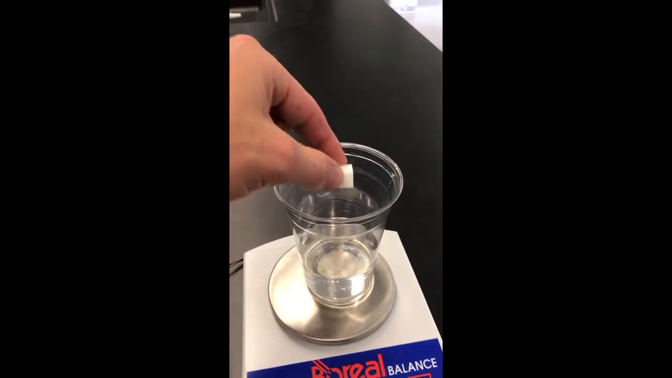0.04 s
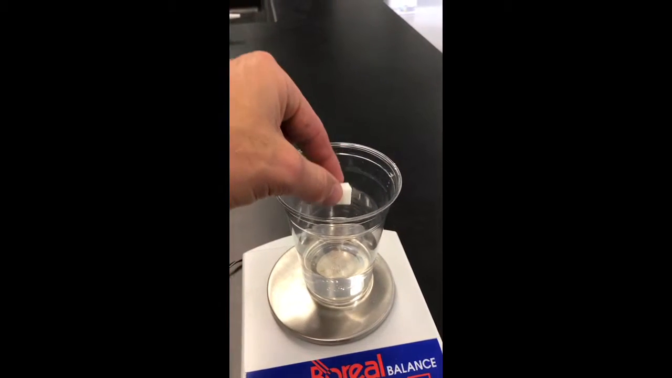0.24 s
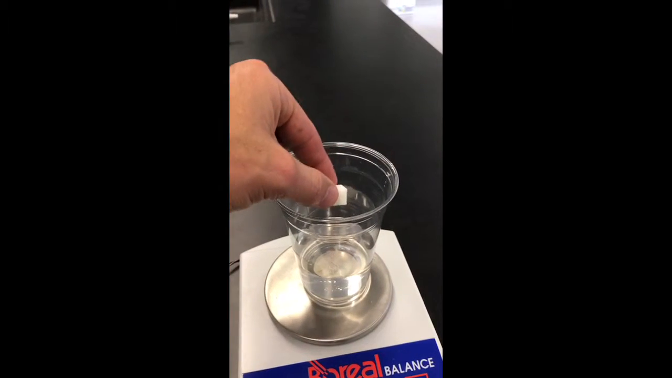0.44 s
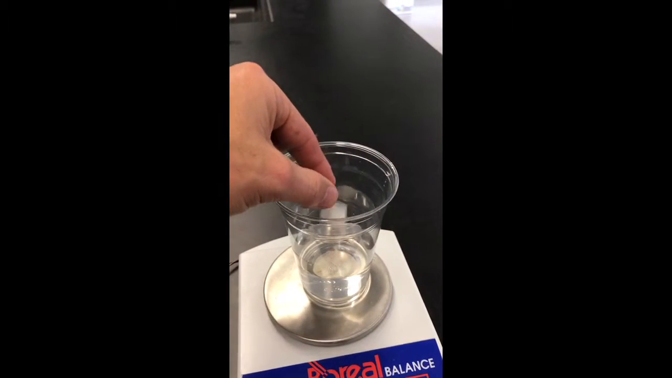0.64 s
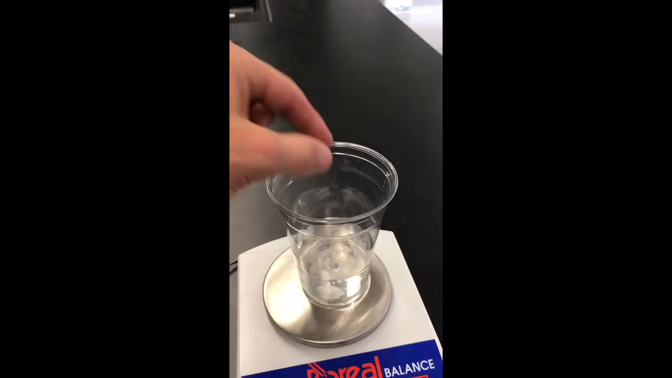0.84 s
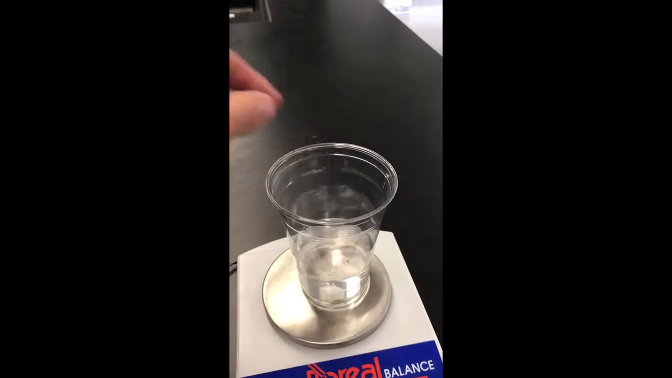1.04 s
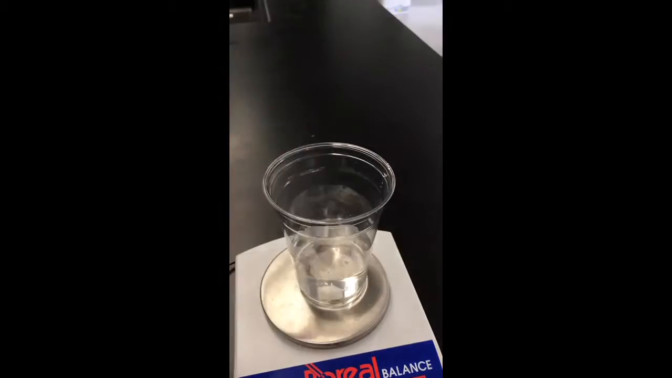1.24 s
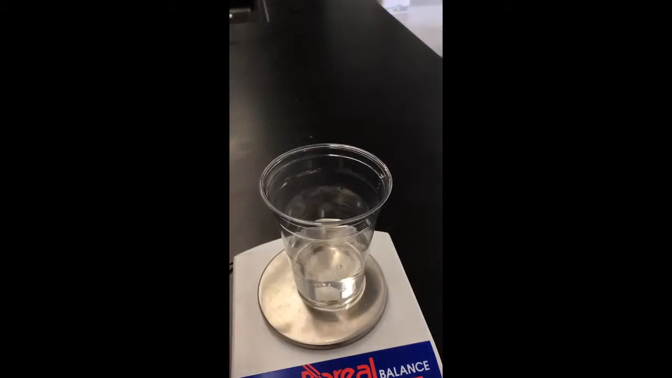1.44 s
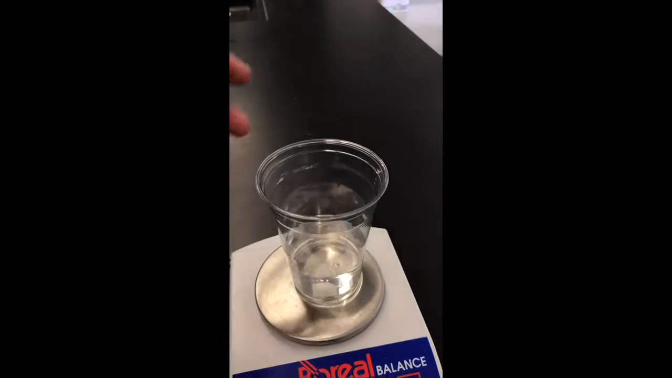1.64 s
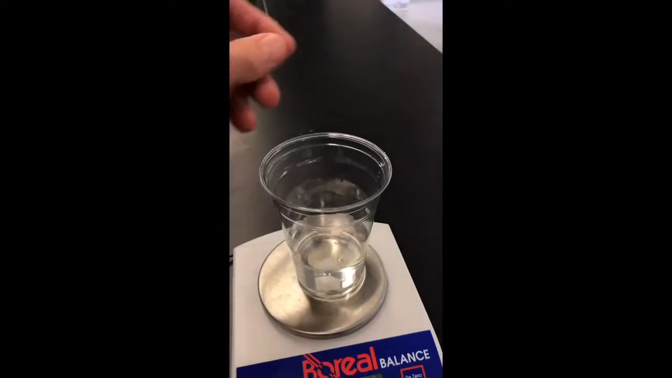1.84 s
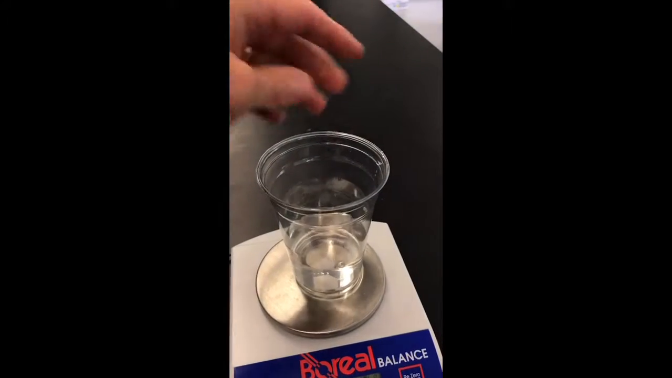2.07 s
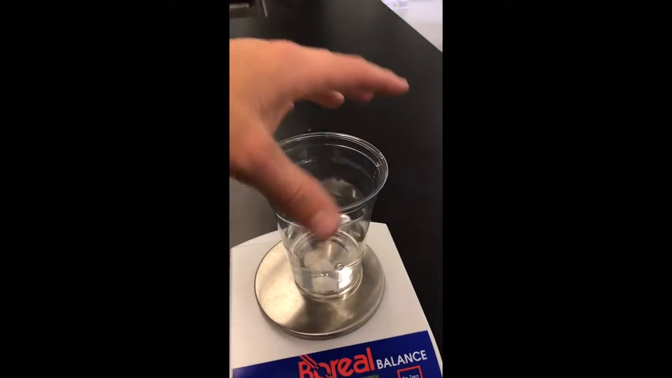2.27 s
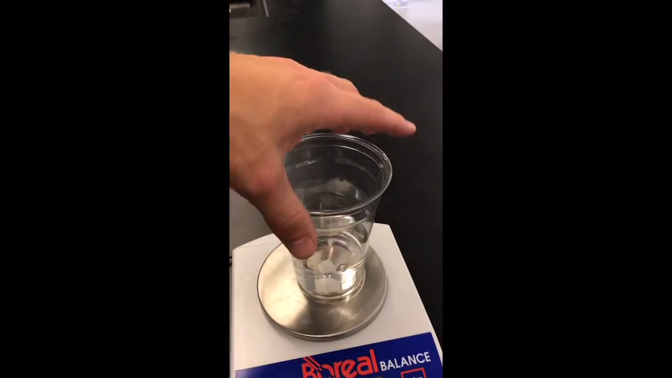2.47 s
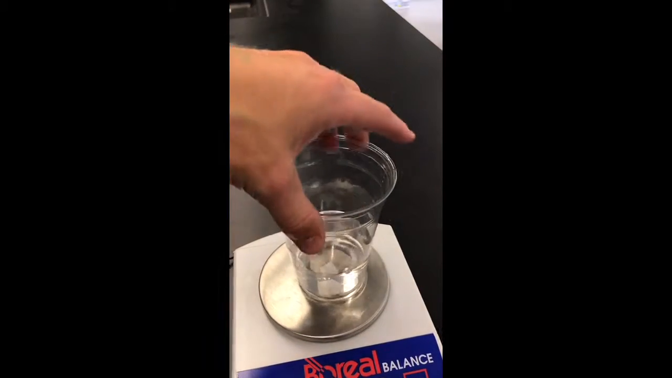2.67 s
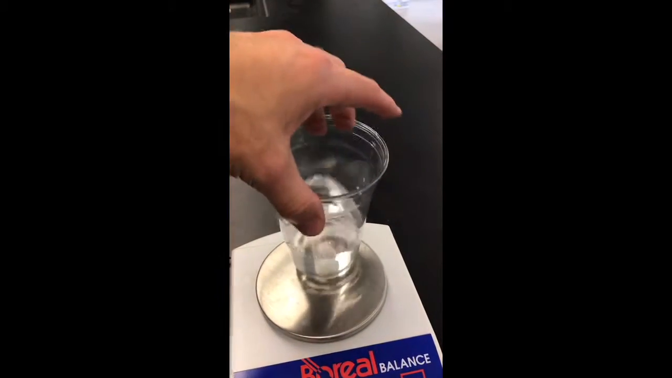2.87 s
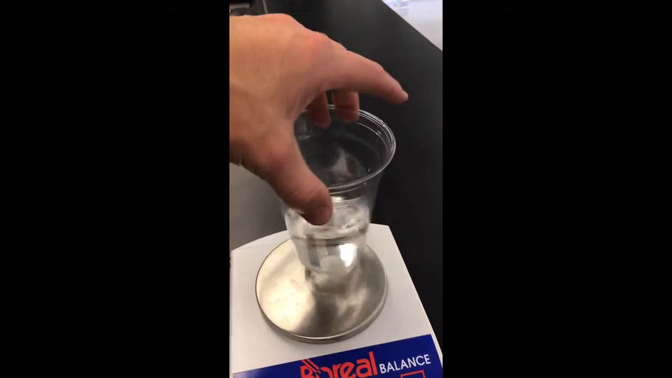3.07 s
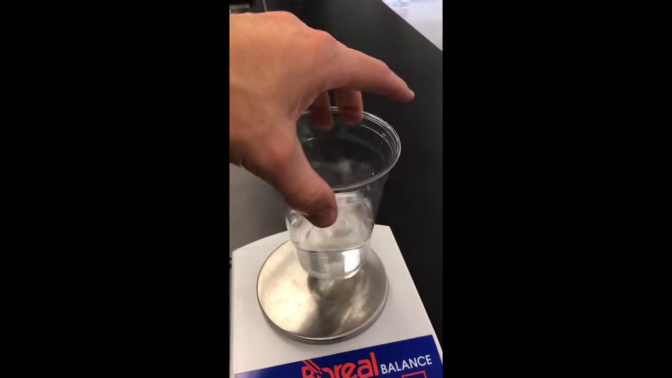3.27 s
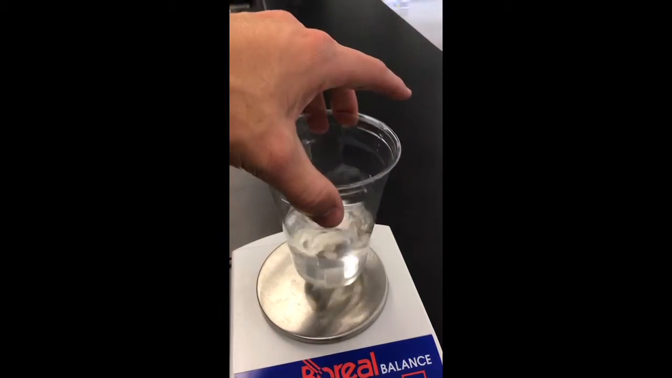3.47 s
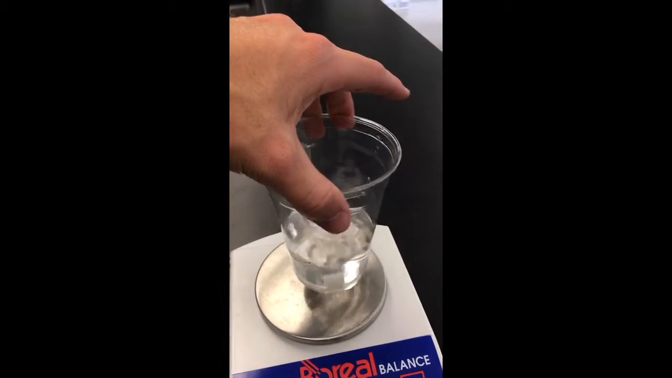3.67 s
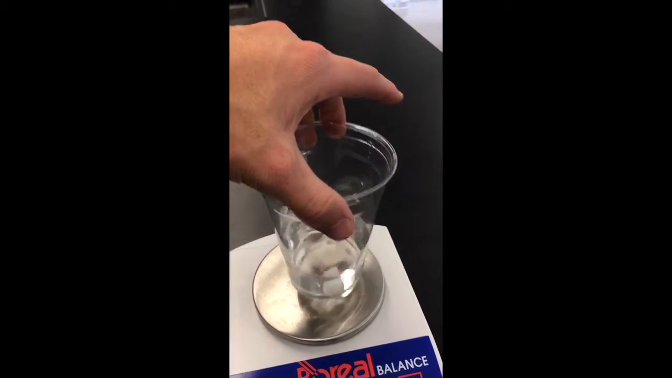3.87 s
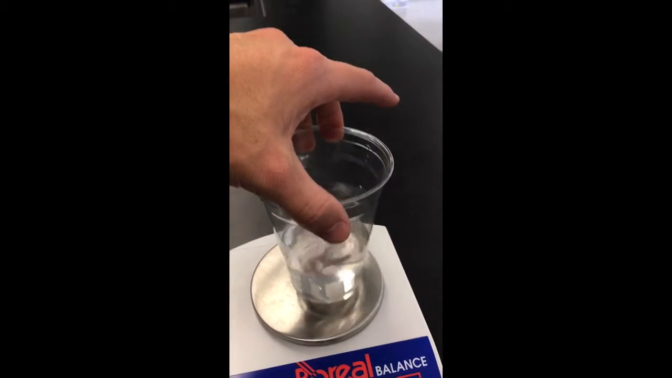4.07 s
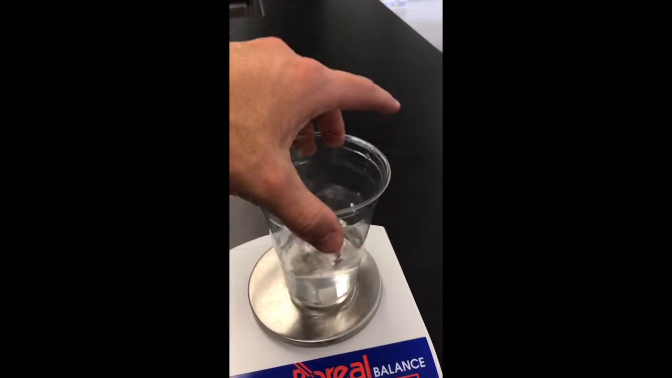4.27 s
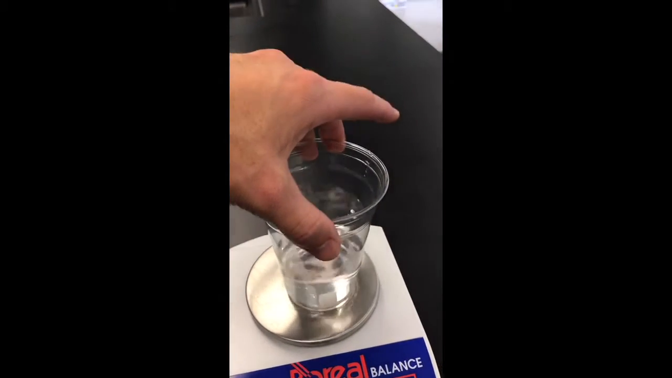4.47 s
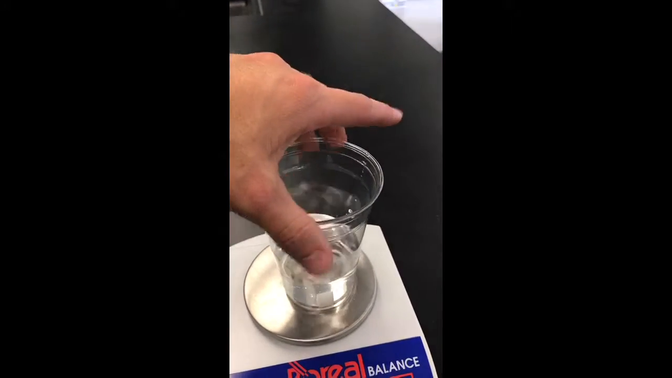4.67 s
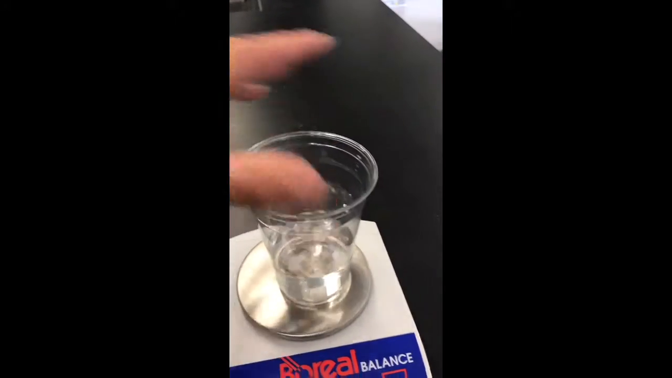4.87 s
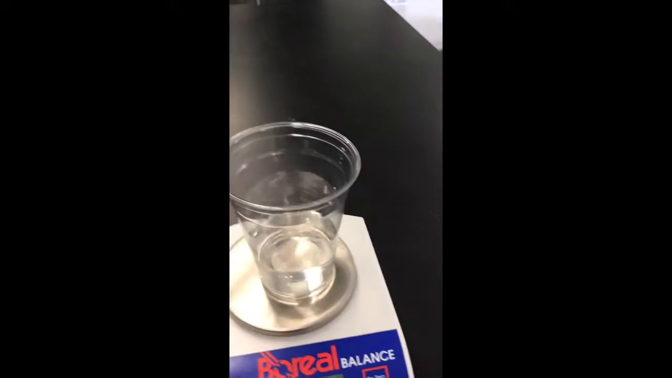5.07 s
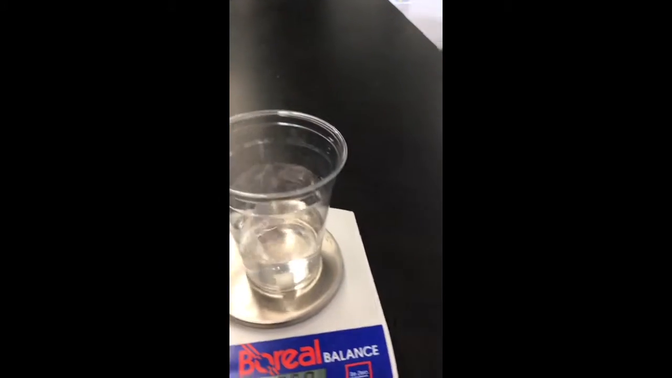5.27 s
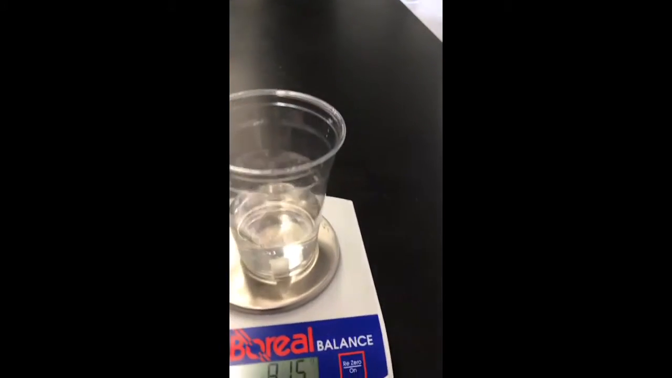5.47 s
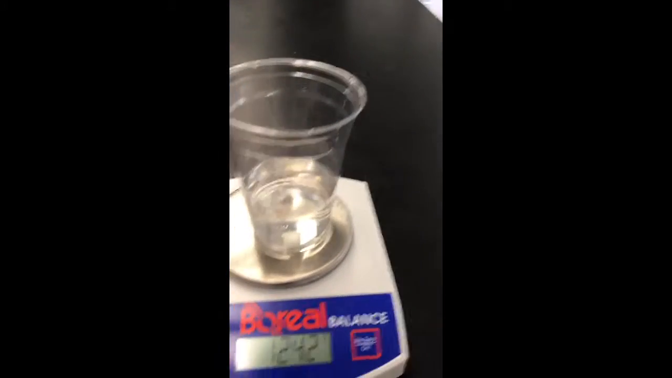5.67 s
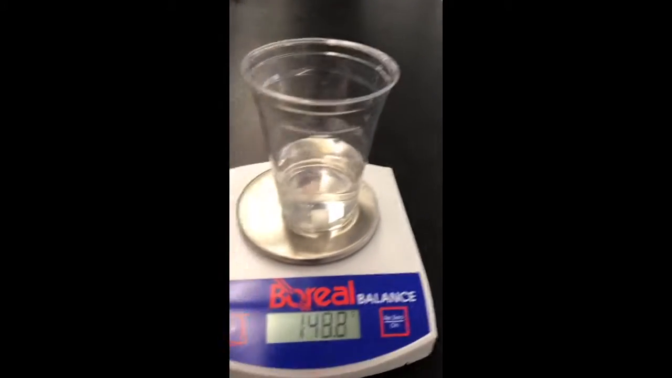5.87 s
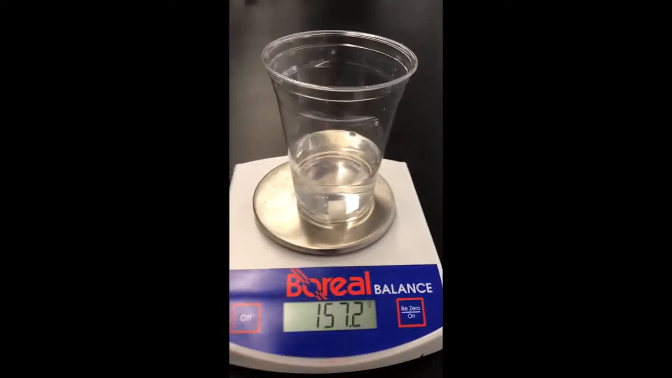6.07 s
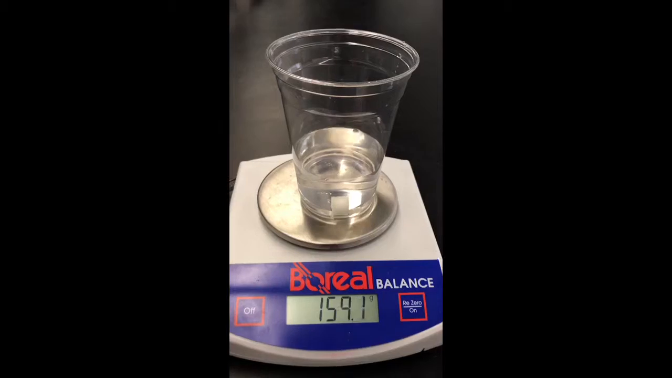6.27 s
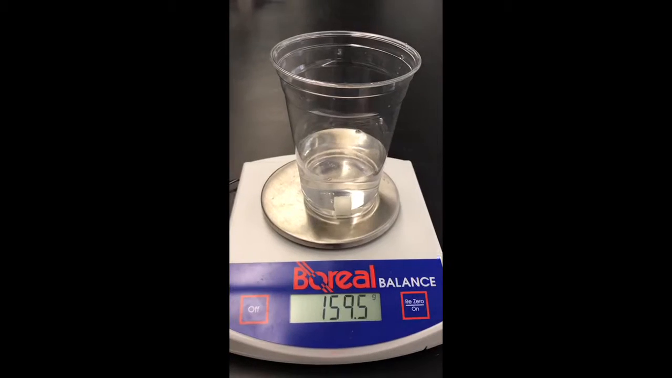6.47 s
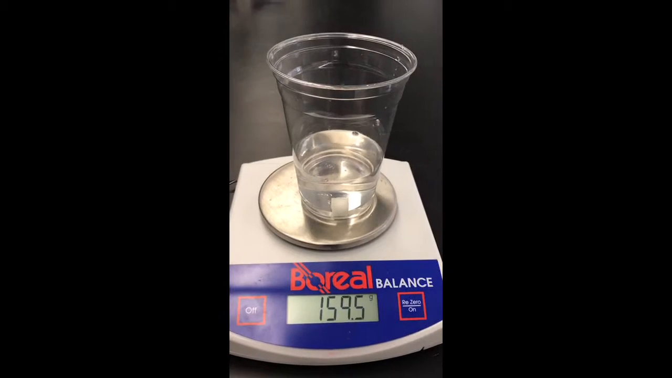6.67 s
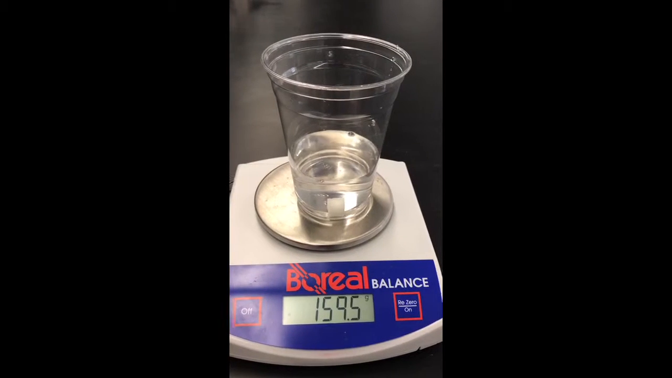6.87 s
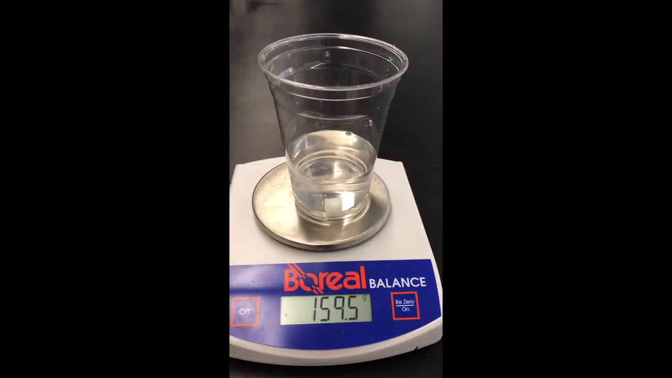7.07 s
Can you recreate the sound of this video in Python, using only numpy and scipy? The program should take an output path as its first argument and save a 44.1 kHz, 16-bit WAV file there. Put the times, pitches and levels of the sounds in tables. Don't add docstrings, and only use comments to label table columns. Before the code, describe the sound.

A sugar cube clacks into a thin plastic cup of water, then light swirling taps and set-down clicks in a quiet, softly humming room.

```python
import sys
import numpy as np
from scipy import signal
from scipy.fft import rfft, irfft, next_fast_len
from scipy.io import wavfile
from scipy.ndimage import map_coordinates

SR = 44100
rng = np.random.default_rng(int(sys.argv[2]) if len(sys.argv) > 2 else 0)


def ratio(d):
    e = np.asarray(d, float) / 20
    return 10 ** e


def materialize(psi):
    bounded = np.clip(np.atleast_2d(psi).T, -1, 1)
    quanta = np.round(bounded * 32767).astype(np.int16)
    wavfile.write(sys.argv[1], SR, quanta)


N = 314105
T = np.arange(N) / SR

# (frequency [Hz], level [dB per Hz])
DUCT_SPECTRUM = [(15, -25), (26, -16), (34, -12), (45, -8.5), (62, -3.5), (100, -3.5), (140, -9.5),
                 (200, -4.5), (250, -16), (320, -17), (500, -19), (1150, -22), (1650, -27.5), (3000, -35.5),
                 (6000, -49.5)]
# (multiple of shaft speed [1], level [dB])
FAN_ORDERS = [(1, -60.5), (4, -59), (5, -61), (6, -76), (7, -77.5)]
# (frequency [Hz], level [dB per Hz])
HISS_SPECTRUM = [(300, -15), (2000, 1), (4000, 1.5), (7000, -0.5), (12000, -3.5), (15900, -5)]
# (frequency [Hz], width [Hz], depth [0-1])
PORT_NOTCHES = [(5000, 240, 0.33), (7660, 650, 0.24), (10400, 590, 0.34)]
# (frequency [Hz], 60 dB decay time [s])
ROOM_DECAY = [(300, 0.35), (1000, 0.48), (3000, 0.39), (6000, 0.36), (12000, 0.17)]
# (time [s], length [s], level
# [dB], centre [Hz])
BRUSHES = [(6.035, .037, -61, 3000), (2.065, .015, -70, 8000), (1.71, .0015, -63, 11500),
           (2.157, .001, -67, 13500), (1.27, .004, -67, 7000), (1.327, .004, -67, 6100),
           (.775, .003, -65, 8000), (1.067, .002, -68, 9500), (3.5915, .0015, -59, 8600)]
# (time [s], level [dB], pitch [Hz], life [cycles])
RATTLES = [(.8300, -9, 5000, 5), (0.8323, -15, 5200, 8.4), (0.836, -16, 8700, 6.3), (0.8395, -18, 2980, 12),
           (.8405, -35, 5500, 6.8), (0.843, -33, 2050, 4.3), (.8470, -20, 2350, 5.1),
           (0.849, -27, 1200, 6.2), (.8545, -37, 2100, 5.4), (.8590, -32, 610, 6.9),
           (0.861, -38, 1100, 6.9), (1.0097, -37, 1860, 11), (1.0100, -39.5, 2700, 16),
           (1.0103, -38, 1030, 8), (1.011, -44, 3800, 7), (1.016, -41, 1900, 6.8)]
# (frequency [Hz], width [Hz], level [dB])
CUP_MODES = [(295, 24, -11), (592, 28, -5), (855, 40, 4.5), (1032, 39, 1), (1154, 34, -4.5),
             (1364, 28, -3.5), (1540, 26, -5), (1735, 46, -1), (1880, 25, 1.5), (2080, 30, -3),
             (2350, 59, -9), (2760, 64, -2), (3200, 90, -23), (3550, 120, -9), (4090, 87, -3),
             (4940, 140, -21), (5500, 200, -16), (6400, 2600, -12.5), (8600, 2100, -34)]
# (frequency [Hz], level [dB per Hz])
SPLASH_SPECTRUM = [(250, -34), (550, 14), (1000, -10), (2500, -4), (5000, -5.5), (8000, -12), (14000, -27)]
# (start [s], length [s], level at the end [dB])
SLIDES = [(2.602, 0.019, -49.5), (2.677, 0.011, -56.5), (2.7, 0.012, -51.5), (4.503, 0.037, -49.5),
          (4.551, .021, -48), (4.698, 0.023, -57)]
# (frequency [Hz], width [Hz], level [dB])
PAN_MODES = [(1650, 300, -5), (2394, 130, 0.5), (2700, 140, 4.5), (2940, 98, 4.5), (3220, 680, -10.5),
             (4750, 600, -10), (5630, 200, -5), (7260, 1500, -14.5), (10900, 3600, -20.5)]
# (frequency [Hz], width [Hz], level [dB])
WALL_MODES = [(1640, 210, -8.5), (2050, 250, -16), (2660, 160, -8), (3170, 360, -22)]
# (frequency [Hz], width [Hz], level [dB])
AIR_MODES = [(856, 60, 5.5), (673, 56, -5), (1000, 63, -10)]
# (frequency [Hz], width [Hz], level [dB])
EDGE_MODES = [(3550, 560, -10.5), (5500, 1600, -10.5), (7200, 820, -7), (8700, 1800, -25),
              (12000, 6000, -39)]
# (time [s], wall level [dB], air column over wall [dB], snap over wall [dB])
NEAR_BASE = [(3.2385, -54, 9, -15), (3.4464, -64, 5, 1), (3.547, -55, 5, -10), (3.5638, -54.5, 12, -13),
             (3.7964, -53.5, 0, 10.5), (3.808, -60, 8, -8), (3.9908, -48, 7.5, -19),
             (4.0536, -39.5, 6.5, -5), (4.066, -53, 9, -10), (4.4634, -44, 2.5, -9), (4.5974, -54, -3, 6)]
# (time [s], wall level [dB], air column over wall [dB], snap over wall [dB])
MID_WALL = [(3.5342, -38, -7, -20), (3.579, -57, 7, -12), (3.9204, -62, 9, -4), (3.9543, -43.5, -5, -7),
            (4.3494, -65, 12, -8), (4.7959, -48.5, -2, -6)]
# (time [s], wall level [dB], air column over wall [dB], snap over wall [dB])
NEAR_RIM = [(2.8868, -57.5, 12, 11), (3.0838, -50.5, -0.5, -4), (3.5254, -32.5, -3.5, -3),
            (3.5338, -36.5, -4, -7), (3.7249, -45.5, -1.5, -5.5), (3.7787, -40.5, -5.5, -6),
            (3.9734, -50, -11, -9), (3.9925, -44, -9, -16), (3.999, -58, 11, -8), (4.2068, -36, -4, -9),
            (4.2264, -54, 4, -11), (4.2621, -53, 8.5, -17), (4.3264, -69, 7, -7), (4.4552, -39, -3.5, 1.5),
            (4.569, -45.5, -1.5, -13)]
# (time [s], wall level [dB], air column over wall [dB], snap over wall [dB])
SET_DOWN = [
    (4.6692, -49.5, -12, 1),
    (4.7256, -37.5, -18, 1.7),
    (4.7424, -44, -20, 2),
    (4.7635, -33, -14, 3.7),
]


def unit(x):
    return x / np.sqrt(np.mean(x ** 2) + 1e-20)


def peak(x):
    return x / np.max(np.abs(x))


def along(points, hz):
    f, v = np.transpose(points)
    return np.interp(np.log(hz + 1), np.log(f + 1), v)


def wobble(rate):
    return map_coordinates(rng.standard_normal(int(N * rate / SR) + 4), [T * rate])


def filtered(x, response):
    m = next_fast_len(len(x) + SR // 2)
    return irfft(rfft(x, m) * response(np.fft.rfftfreq(m, 1 / SR)), m)[:len(x)]


def modes(table):
    def response(f):
        total = 0
        for k, (centre, width, db) in enumerate(table):
            damping = 1j * f * width
            total = total + (-1) ** k * ratio(db) * damping / (centre * centre - f * f + damping)
        return total
    return response


def noise(spectrum):
    return unit(filtered(rng.standard_normal(N), lambda hz: ratio(along(spectrum, hz))))


def add(out, s, piece):
    out[round(s * SR):][:len(piece)] += piece


def room(x):
    hz, t, z = signal.stft(rng.standard_normal(SR // 2), SR, nperseg=256)
    decay = ratio(-60 * t / along(ROOM_DECAY, hz)[:, None])
    tail = signal.istft(z * decay, SR, nperseg=256)[1]
    delayed = np.pad(x, (300, 0))
    return signal.fftconvolve(delayed, tail / np.linalg.norm(tail))[:N]


def ventilation():
    air = noise(DUCT_SPECTRUM)
    low = filtered(air, lambda hz: 1 / (1 + (hz / 300) ** 4))
    rumble = ratio(0.26 * wobble(1.38) + 1.44 * wobble(4.77)) * low
    rush = ratio(0.25 * wobble(0.8) + 0.6 * wobble(2.4)) * (air - low)
    return ratio(-55) * (rumble + rush)


def fan():
    motor_hz = 58.16
    turn = 2 * np.pi * motor_hz * T
    out = np.zeros(N)
    for k, db in FAN_ORDERS:
        level = ratio(db + 1.57 * wobble(3.06))
        out += level * np.sin(k * turn + 0.18 * wobble(4.1) + 7 * rng.random())
    return np.sqrt(2) * out


def mains():
    level = ratio(-58.5 + 2.3 * wobble(12))
    return np.sqrt(2) * level * np.sin(2 * np.pi * 120 * T + 0.53 * wobble(8))


def lamp():
    whistle_hz, level_db, fading_db = 15226, -86, 3
    shadow_s, shadow_half_s, shadow_db = 6.53, 0.2, -14
    shadow = shadow_db * np.exp(-((T - shadow_s) / shadow_half_s) ** 4)
    level = ratio(level_db + fading_db * wobble(7) + shadow)
    return np.sqrt(2) * level * np.sin(2 * np.pi * whistle_hz * T + 0.8 * wobble(7))


def microphone_hiss():
    duck_s, hold_s, ramp_s, duck_db = 6.682, 0.062, 0.01, -10.5
    outside_s = np.maximum(duck_s - T, T - duck_s - hold_s)
    duck = ratio(duck_db * np.clip(1 - outside_s / ramp_s, 0, 1))
    return ratio(-66) * duck * noise(HISS_SPECTRUM)


def rustle():
    out = np.zeros(N)
    for s, length, db, hz in BRUSHES:
        t = np.arange(-3 * length, 3 * length, 1 / SR)
        width_hz = hz * np.clip(90 * length, 0.25, 1.8)
        band = modes([(hz, width_hz, 0)])
        puff = unit(filtered(rng.standard_normal(10000), lambda f: band(f) ** 2))[:len(t)]
        add(out, s - 3 * length, ratio(db) * puff * np.exp(-(t / length) ** 2))
    return out


def blow():
    push, t, push_s = np.zeros(N), np.arange(1500) / SR, 0.00016
    add(push, 0.8294, ratio(7.5) * np.sin(np.pi * np.clip(t / push_s, 0, 1)))
    closing = ratio(-1100 * np.clip(T - 0.841, 0, 1))
    return closing * filtered(push, modes(CUP_MODES))


def rattle():
    out, t = np.zeros(N), np.arange(1500) / SR
    for s, db, hz, cycles in RATTLES:
        turns = hz * t
        envelope = ratio(db - 25 * turns / cycles) * (1 - np.exp(-turns))
        add(out, s, envelope * np.sin(2 * np.pi * turns))
    return out


def crunch():
    start_s, start_db, sag_db_per_s = 0.8298, -29.5, 650
    soaked_s, soak_db_per_s = 0.843, 2500
    level_db = start_db - sag_db_per_s * np.clip(T - start_s, 0, 1)
    level_db = level_db - soak_db_per_s * np.clip(T - soaked_s, 0, 1)
    level_db = level_db - 70000 * np.clip(start_s - T, 0, 0.01)
    grit = noise([(1200, -42), (2500, -2.5), (5000, -5), (10000, -15), (15500, -26)])
    return ratio(level_db + 3.5 * wobble(700)) * grit


def settling():
    spray = np.zeros(N)
    spray[[round(0.836 * SR), round(0.848 * SR)]] = ratio(-14)
    return filtered(room(spray), lambda hz: ratio(along(SPLASH_SPECTRUM, hz)))


def drop():
    cup = blow() + rattle()
    return cup + ratio(-19.5) * room(cup) + crunch() + settling()


def scrape():
    grip_s, let_go_s, press_db = 0.008, 0.015, 5.5
    grains = rng.standard_normal(N) * ratio(2 * wobble(900) + wobble(120))
    stroke = np.zeros(N)
    for s, length, db in SLIDES:
        press = press_db * np.clip(1 - (T - s) / length, 0, 1)
        rise = 20 * np.clip(s - T, 0, 1) / grip_s
        fall = 20 * np.clip(T - s - length, 0, 1) / let_go_s
        stroke += ratio(db - press - rise - fall)
    return stroke * unit(filtered(grains, modes(PAN_MODES)))


def tap(air_db, snap_db, wall_hz, snap_hz):
    t = np.arange(3000) / SR
    grit = rng.standard_normal((5, len(t)))
    wall_hz = wall_hz * np.exp(0.025 * grit[1, 0])
    snap_hz = snap_hz * np.exp(0.08 * grit[3, 0])
    contact = t * ratio(-60 * t / 0.0068)

    tilt = np.exp(0.025 * np.clip(grit[0, 0], -1.5, 1.5))
    column = [(c * tilt, w, g) for c, w, g in AIR_MODES]
    puff = (1 + 0.69 * grit[0]) * t ** 2 * ratio(-60 * t / 0.0043)
    air = filtered(puff, modes(column))

    damped_hz = 152 + 40 * max(-8 - air_db, 0)
    wall = filtered(grit[1] * contact, modes([(wall_hz, damped_hz, 0)]))
    wall = wall + filtered(grit[2] * contact, modes(WALL_MODES))

    bite = t * ratio(-60 * t / 0.0057)
    snap = filtered(grit[3] * contact, modes([(snap_hz, 450, 0)]))
    snap = snap + filtered(1.46 * grit[4] * bite, modes(EDGE_MODES))
    return ratio(air_db) * peak(air) + peak(wall) + ratio(snap_db) * peak(snap)


def taps_at(contacts, wall_hz, snap_hz):
    out = np.zeros(N)
    for s, db, air_db, snap_db in contacts:
        add(out, s + 0.0004, ratio(db) * tap(air_db, snap_db, wall_hz, snap_hz))
    return out


def taps():
    base = taps_at(NEAR_BASE, wall_hz=1560, snap_hz=4000)
    middle = taps_at(MID_WALL, wall_hz=1670, snap_hz=3700)
    rim = taps_at(NEAR_RIM, wall_hz=2635, snap_hz=5130)
    landing = taps_at(SET_DOWN, wall_hz=2550, snap_hz=4330)
    return base + middle + rim + landing


def scene():
    background = ventilation() + fan() + mains() + lamp()
    held = scrape() + taps()
    swirl = np.sin(np.pi * T / 0.11) ** 2
    answer = ratio(-17.5) * (room(swirl * held) + room((1 - swirl) * held))
    return (background + rustle() + drop() + held + answer)[None]


def band_limit(x):
    return signal.sosfilt(signal.butter(12, 16430, fs=SR, output="sos"), x)


def record(dry):
    x = dry[0] + microphone_hiss()

    def port(hz):
        dips = sum(depth * np.exp(-((hz - c) / w) ** 2) for c, w, depth in PORT_NOTCHES)
        return (hz < 15830) * (1 - dips)

    return band_limit(filtered(x, port)[None])


dry = scene()
out = record(dry)
materialize(out)
```